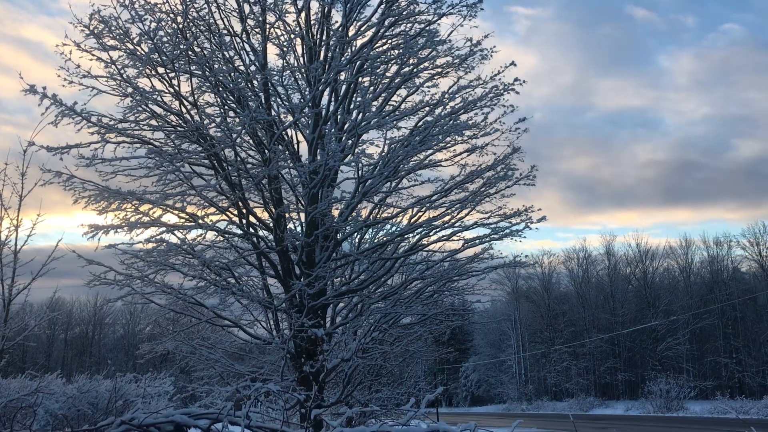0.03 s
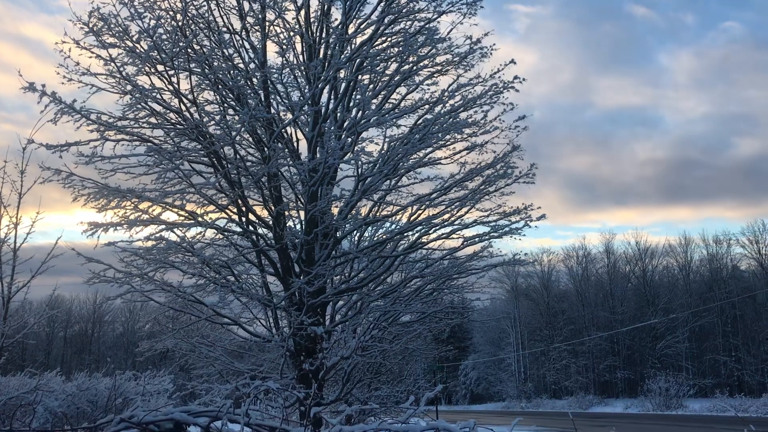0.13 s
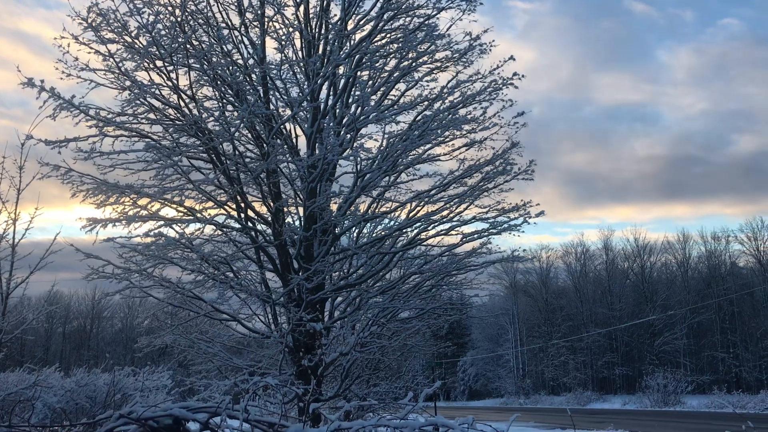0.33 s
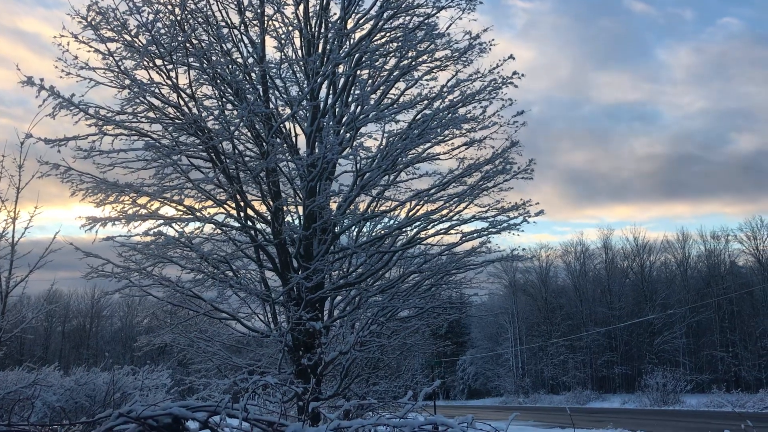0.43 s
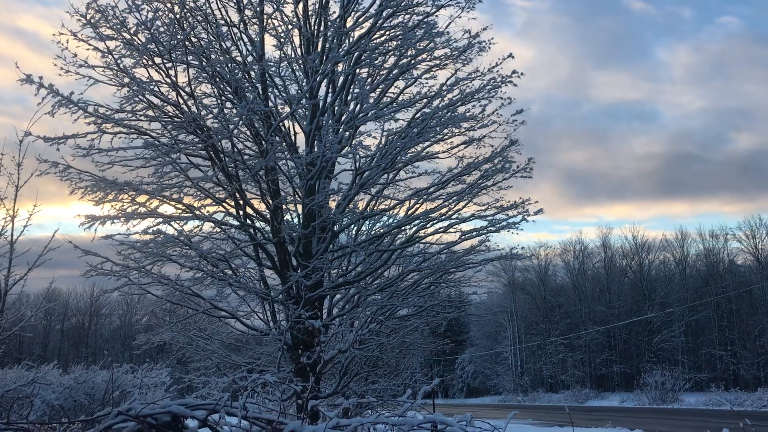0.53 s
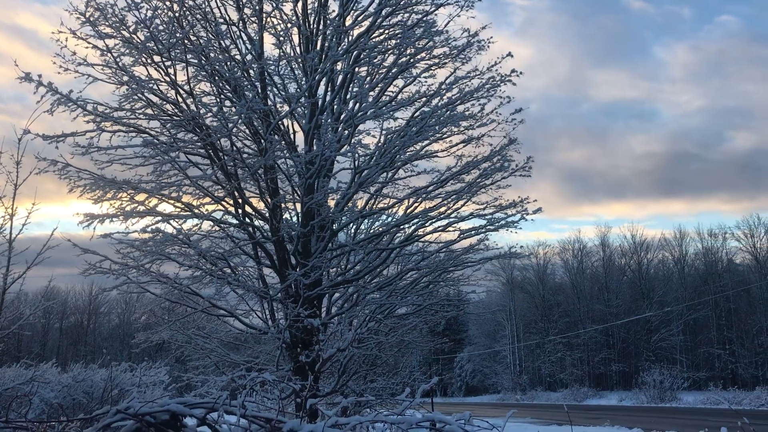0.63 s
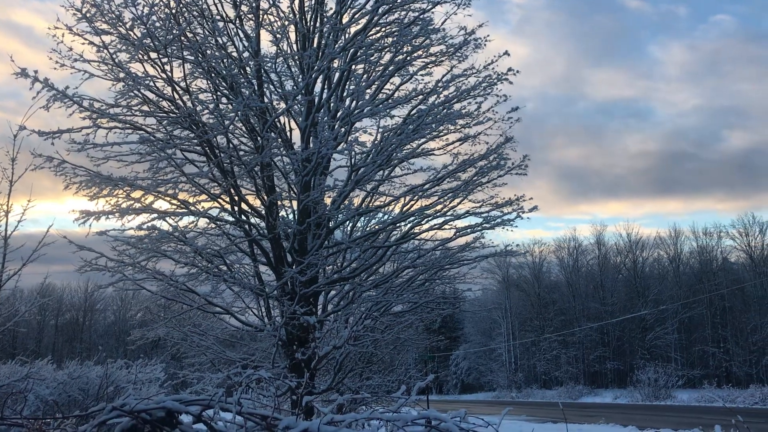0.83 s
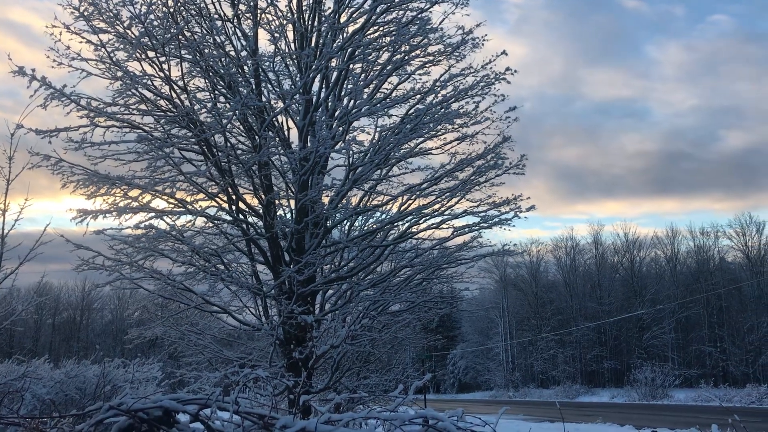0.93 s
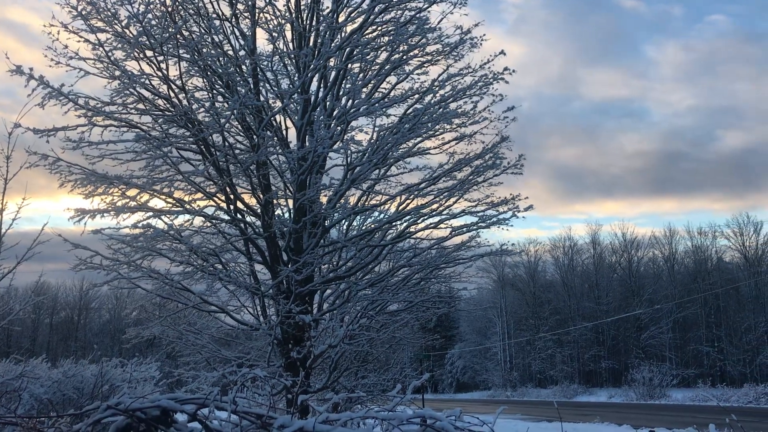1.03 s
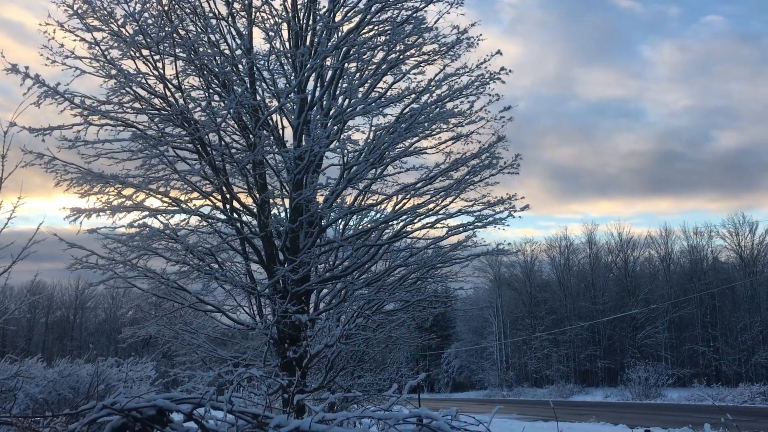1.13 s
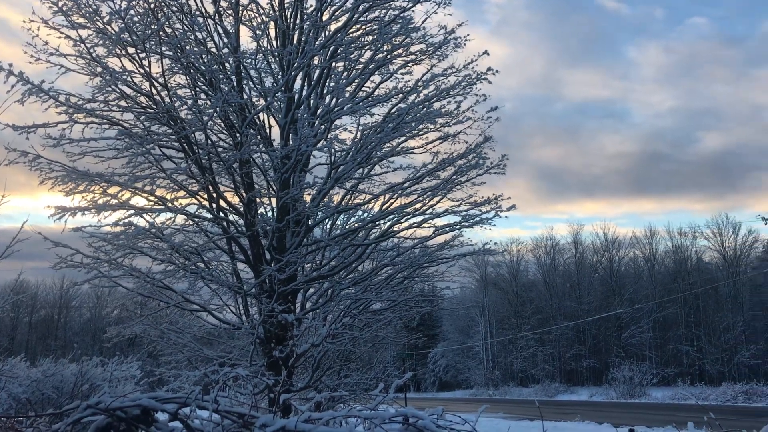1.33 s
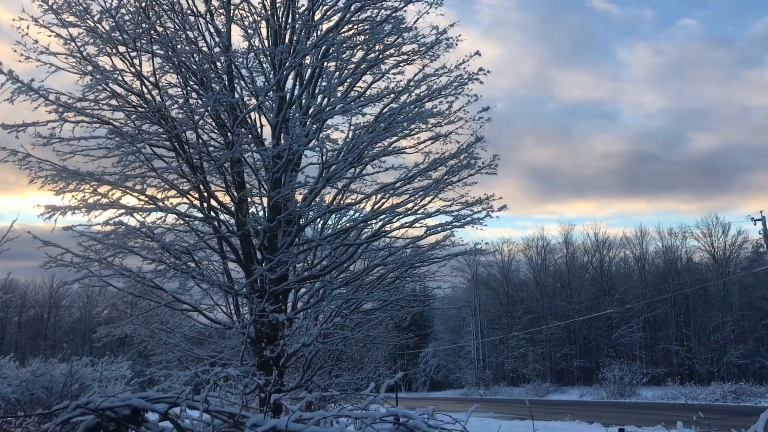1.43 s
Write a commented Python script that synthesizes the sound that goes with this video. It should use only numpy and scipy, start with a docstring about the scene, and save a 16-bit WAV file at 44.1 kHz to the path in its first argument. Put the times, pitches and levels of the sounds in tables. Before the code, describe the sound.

Ice-coated branches tick and crackle faintly over a low wind rumble.

```python
"""An ice-coated tree stirs in a light winter wind. From the start there is a thin hiss and a far,
steady rush, likely tyres on a road. The ice begins to tick and crackle, most while the branches sway,
and swirls of air bump softly against the microphone. A sharp snap comes at 0.9 s and the biggest
bump just after 1 s. Then the crackle thins out, and one last snap stands clear at 1.4 s."""
import sys
import numpy as np
from scipy import signal
from scipy.fft import rfft, irfft
from scipy.io import wavfile
from scipy.ndimage import uniform_filter1d

SR = 44100
rng = np.random.default_rng(int(sys.argv[2]) if len(sys.argv) > 2 else 0)


def waveform_to_disk(signal):
    """Save audio, clipped to [-1, 1], as 16-bit WAV at the path in sys.argv[1]."""
    frames = np.transpose(np.atleast_2d(signal))
    scaled = np.clip(frames, -1, 1) * 32767
    samples = np.round(scaled).astype(np.int16)
    wavfile.write(sys.argv[1], SR, samples)


N = 66150  # 1.5 seconds


def undb(db):
    """Turn decibels into a number to multiply a sound by."""
    return 10 ** (np.asarray(db) / 20)


def level(x, db):
    """Set a sound's average (rms) level."""
    return x * undb(db) / np.sqrt(np.mean(x ** 2))


def curve(points):
    """Draw a volume curve through (time_s, level_db) points."""
    return undb(np.interp(np.arange(N) / SR, *np.array(points).T))


def colour(x, points):
    """Turn a sound's low and high parts up or down, following (pitch_hz, gain_db) points."""
    hz, db = np.array(points).T
    log_hz = np.log(np.fft.rfftfreq(N, 1 / SR) + 1)
    return irfft(rfft(x) * undb(np.interp(log_hz, np.log(hz), db)), N)


def cut(x, side, hz, order):
    """Keep the "low" or "high" side of a pitch; a higher order cuts more steeply."""
    return signal.sosfilt(signal.butter(order, hz, side, fs=SR, output="sos"), x)


def wander(per_s):
    """A smooth random drift, about 1 in size."""
    hold = int(SR / per_s)
    steps = np.repeat(rng.standard_normal(N // hold + 1), hold)
    return level(uniform_filter1d(steps, hold)[:N], 0)


def add(out, start_s, sound):
    """Mix a sound in at the given time."""
    part = out[int(start_s * SR):][:len(sound)]
    part += sound[:len(part)]


# The tone of the hiss: pitch_hz, gain_db
HISS_TONE = [(300, -2), (2000, 3.5), (3500, 1.5), (5000, -2.5), (9000, -4.5), (15500, -8)]

def hiss():
    """A thin, even hiss lies behind everything."""
    return level(colour(rng.standard_normal(N), HISS_TONE), -69.5)


# The tone of the far road: pitch_hz, gain_db
ROAD_TONE = [(60, -2.5), (150, -6.5), (230, -7.5), (310, -2.5), (420, -7), (520, -9.5), (640, -3), (740, 1),
             (830, -0.5), (950, -4.5), (1100, -3.5), (1400, -10.5), (1700, -13), (2100, -28.5), (4000, -48)]
# How a faint note in the rush comes and goes: time_s, level_db
WHINE_LEVELS = [(0, -77), (.3, -70), (.6, -66.5), (.75, -82), (1.15, -73), (1.5, -80)]

def far_road():
    """Far tyres blur into a barely wavering rush, with a faint whine that drifts in pitch."""
    rush = level(colour(rng.standard_normal(N), ROAD_TONE), -60)
    waver = undb(-0.5 * wander(per_s=5.3))
    whine_hz = 765 + 9.06 * wander(per_s=25)
    whine = level(np.sin(2 * np.pi * np.cumsum(whine_hz) / SR), 0)
    return rush * waver + whine * curve(WHINE_LEVELS)


# The tone of the wind's rumble: pitch_hz, gain_db
RUMBLE_TONE = [(20, -21), (35, -2), (55, 2), (75, -1), (110, -11.5), (180, -18.5), (400, -41), (900, -78)]
# How the rumble rises and falls: time_s, level_db
RUMBLE_LEVELS = [(0, -57), (.12, -64.5), (.3, -58.5), (.55, -50.5), (.7, -55.5), (.92, -58), (1.08, -44.5),
                 (1.18, -63), (1.35, -62), (1.5, -56.5)]

def wind_rumble():
    """Light wind makes a soft, deep rumble on the microphone."""
    return level(colour(rng.standard_normal(N), RUMBLE_TONE), 0) * curve(RUMBLE_LEVELS)


# Thumps from swirls of air hitting the microphone: start_s, strength_db, pitch_hz, decay_ms, churn_db
# (churn is the rough flutter inside a thump; its level is counted from the thump's strength)
THUMPS = [(0.169, -43, 65, 13, -16.5), (0.286, -41, 65, 10.6, -16), (.428, -50.5, 60.5, 30, -18),
          (.4965, -41.5, 86, 6.9, -25), (0.525, -43, 62, 5, -18), (0.6007, -40, 130, 3.1, -5.5),
          (.624, -44, 160, 7.2, -14), (0.647, -35, 77.6, 8, -12), (0.676, -39, 60.5, 5.8, -17),
          (0.715, -43.5, 114, 5.7, -21), (.741, -45, 73, 8.3, -12), (0.787, -37, 63, 8.1, -16.5),
          (0.887, -45, 48, 6.3, -20), (0.933, -49, 59, 9, -17), (.997, -46, 127, 2, -22),
          (1.0094, -37, 95.5, 12.3, -16), (1.0638, -28, 89.8, 4.8, -12), (1.115, -46, 53, 8.1, -16)]

def wind_bumps(sag_share=0.21, sag_ms=30):
    """Each swirl makes a soft, low thump on the microphone that swells, sinks in pitch and dies away."""
    t, thumps = np.arange(N) / SR, np.zeros(N)
    noise = rng.standard_normal(N)
    for start_s, strength_db, pitch_hz, decay_ms, churn_db in THUMPS:
        age_ms = np.maximum(t - start_s, 0) * 1000
        sinking_hz = pitch_hz * (1 - sag_share * (1 - np.exp(-age_ms / sag_ms))) * (age_ms > 0)
        low_note = np.sin(2 * np.pi * np.cumsum(sinking_hz) / SR)
        swell = age_ms / decay_ms * np.exp(1 - age_ms / decay_ms)
        churn = level(cut(noise, "low", 2.82 * pitch_hz, order=6), churn_db)
        thumps += undb(strength_db) * swell * (swell * churn - low_note)
    smoothed = cut(thumps, "low", hz=380, order=4)
    return cut(smoothed, "high", hz=28, order=2)


def twig_echo(x, echo_db=-6.5, decay_s=0.014):
    """Nearby twigs add a short, faint echo, different for every spot in the tree."""
    t = np.arange(len(x)) / SR
    tail = rng.standard_normal(len(x)) * np.exp(-t / decay_s)
    echo = signal.fftconvolve(x, tail / np.linalg.norm(tail))[:len(x)]
    return x + undb(echo_db) * echo


def ice_snap(decay_ms, low_cut_hz, ring_hz, ring_gain, rise_ms=0.72, ring_width_hz=1800):
    """A dying run of tiny breaks makes one piece of ice ring briefly at its own pitch."""
    age_ms = np.arange(3072) / SR * 1000
    shape = (1 - np.exp(-age_ms / rise_ms)) * np.exp(-age_ms / decay_ms)
    push_or_pull = rng.choice([-1, 1], len(shape))
    sizes_db = 6 * rng.standard_normal(len(shape))
    breaks = shape * push_or_pull * undb(sizes_db)
    ring = signal.lfilter(*signal.iirpeak(ring_hz, ring_hz / ring_width_hz, fs=SR), breaks)
    tick = cut(breaks + ring_gain * ring, "high", low_cut_hz, order=2)
    tick *= np.linalg.norm(shape / shape.max()) / np.linalg.norm(tick)  # about 1 at its loudest
    return twig_echo(tick)


# The tone of the fine crackle: pitch_hz, gain_db
CRACKLE_TONE = [(1200, -13), (2500, -8), (4200, 6), (6500, 2), (9000, 0.5), (15500, -1.5)]
# How the swaying branches turn the crackle up and down: time_s, gain_db
BRANCH_SWAY = [(0, -8), (.1, -3), (.18, 0.5), (.24, -4), (.3, -1), (.4, -1), (.5, 0), (.6, -0.5),
               (.68, 1.5), (.76, -0.5), (.82, 0), (.93, 0), (1.0, -4), (1.13, -0.5), (1.2, -7), (1.5, -4.5)]

def fine_crackle(twig_count=80, snaps_per_s=480, spread_db=2.5):
    """Icy twigs all over the tree snap faintly, each at its own pitch, louder as the branches sway."""
    twigs = [ice_snap(decay_ms=0.6, low_cut_hz=1480, ring_hz=hz, ring_gain=0.97)
             for hz in rng.uniform(3070, 11200, twig_count)]
    which_twig = rng.integers(twig_count, size=N)
    sizes = undb(spread_db * np.minimum(rng.standard_normal(N), 2))  # capped so none sticks out
    out = np.zeros(N)
    for i in np.flatnonzero(rng.random(N) < snaps_per_s / SR):
        add(out, i / SR, sizes[i] * twigs[which_twig[i]])
    return level(colour(out, CRACKLE_TONE), -72.5) * curve(BRANCH_SWAY)


# Single cracks in the ice: start_s, strength_db, decay_ms, low_cut_hz, ring_hz, ring_gain
NEAR_CRACKS = [(.1475, -66, .4, 3500, 7750, .3), (0.167, -63, .66, 3000, 7900, .5),
               (.190, -63, 1.8, 1800, 8800, .8), (.241, -60, 0.3, 4000, 8500, .2),
               (.2733, -63, 1.8, 4500, 9200, 0.66), (0.286, -61, 5.8, 4020, 10800, 0.7),
               (0.325, -67, 1.1, 4000, 12500, .3), (.329, -68, 1.6, 2190, 3270, 1.8),
               (.3645, -64.5, 1.2, 2980, 6450, 0.76), (0.5798, -65, 4.1, 2800, 15000, .5),
               (.6053, -62, 1, 4000, 5100, 3.5), (0.6163, -65, 1.7, 3500, 8530, 1.8),
               (.6435, -65.5, 2, 6000, 8550, .6), (0.664, -62, 2.6, 4500, 15000, .8),
               (0.675, -66, .9, 3000, 6000, .3), (.722, -67, 1.4, 2980, 4050, 1.3),
               (.810, -66, 6.1, 3000, 4700, 0.55), (0.847, -66, 0.85, 4000, 6550, .6),
               (0.8819, -54, .45, 4620, 13800, 1.7), (0.9089, -49, 0.22, 4700, 9600, .1),
               (0.9143, -65, 1.4, 2010, 8300, .7), (0.917, -64.5, .9, 5000, 7000, .6),
               (.929, -65, 1.6, 2300, 5000, 1.2), (0.939, -60, 1.1, 2480, 6200, .8),
               (.945, -59, 0.84, 4470, 7670, .5), (1.1161, -54, 1.9, 2220, 12100, 0.71),
               (1.249, -61, 1.3, 5550, 8800, .8), (1.294, -63, 1.3, 3500, 3190, .3),
               (1.4146, -50, 0.61, 5450, 13600, 1)]
# The tone these cracks share: pitch_hz, gain_db
ICE_TONE = [(1200, -6), (2700, 10.5), (4300, 0.5), (6500, 1), (9000, 1.5), (13000, -2.5), (15800, -8)]

def near_cracks(boost_db=1):
    """The ice on the nearer branches breaks in louder, separate snaps."""
    out = np.zeros(N)
    for start_s, strength_db, decay_ms, low_cut_hz, ring_hz, ring_gain in NEAR_CRACKS:
        snap = ice_snap(decay_ms, low_cut_hz, ring_hz, ring_gain)
        add(out, start_s, undb(strength_db + boost_db) * snap)
    return colour(out, ICE_TONE)


def scene():
    """Road, hiss, wind and ice all meet at one microphone."""
    return (far_road() + hiss() + wind_bumps() + wind_rumble() + near_cracks() + fine_crackle())[None]


# Narrow bands of treble that the microphone picks up less well: pitch_hz, width_hz, gain_db
TREBLE_DIPS = [(7680, 360, -3.5), (10400, 470, -4.5)]

def record(dry, top_hz=16000):
    """The microphone softens two narrow bands of treble and loses the very highest sounds."""
    count = dry.shape[-1]
    hz = np.fft.rfftfreq(count, 1 / SR)
    dips_db = sum(gain_db * np.exp(-.5 * ((hz - pitch_hz) / width_hz) ** 2)
                  for pitch_hz, width_hz, gain_db in TREBLE_DIPS)
    return irfft(rfft(dry) * undb(dips_db) * (hz < top_hz), count)


dry = scene()
out = record(dry)
waveform_to_disk(out)
```